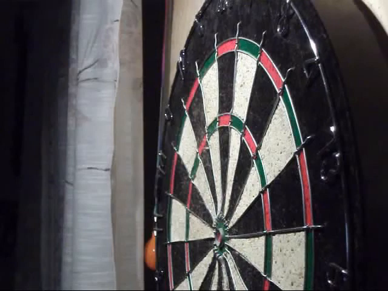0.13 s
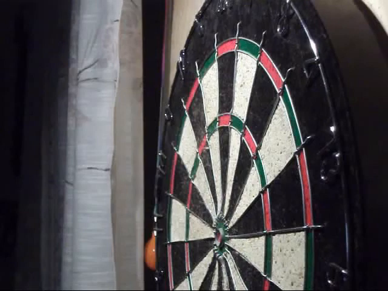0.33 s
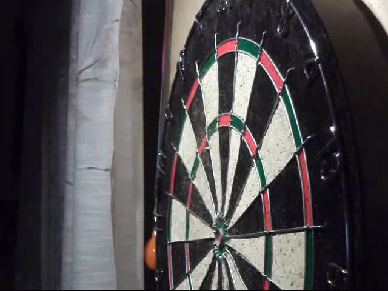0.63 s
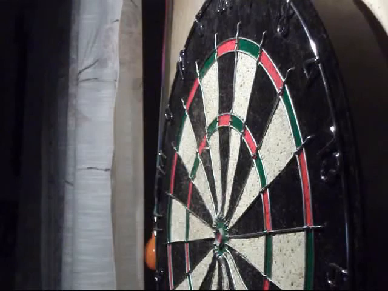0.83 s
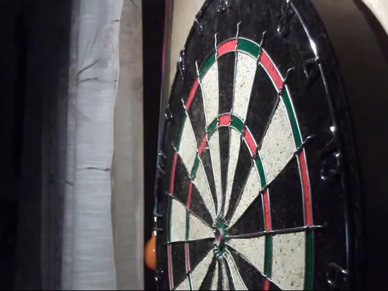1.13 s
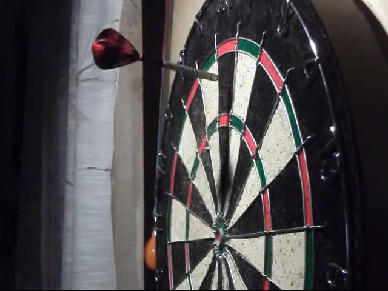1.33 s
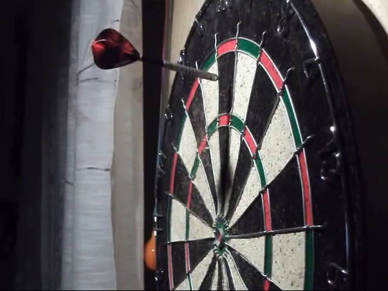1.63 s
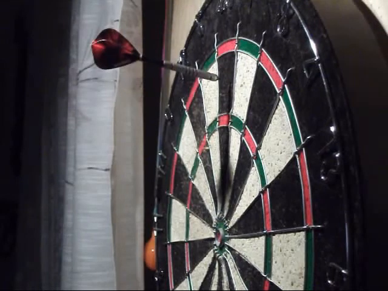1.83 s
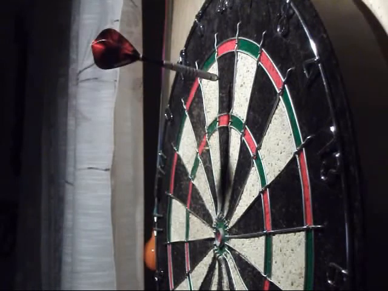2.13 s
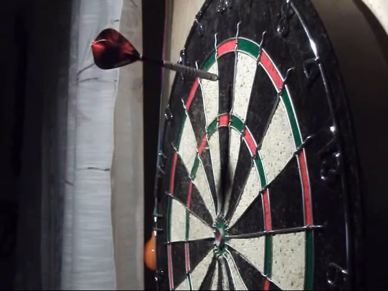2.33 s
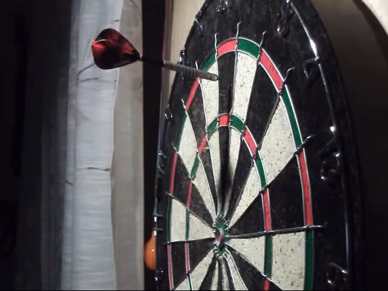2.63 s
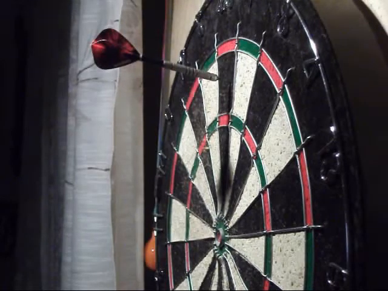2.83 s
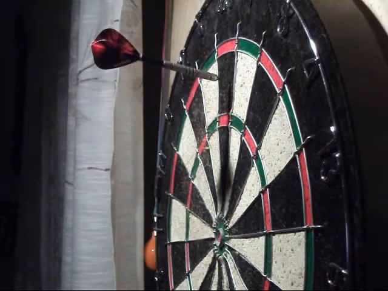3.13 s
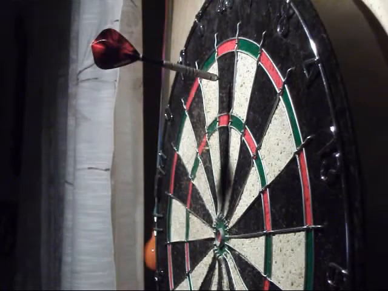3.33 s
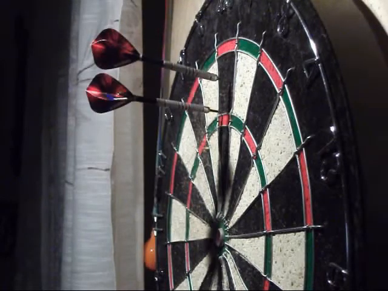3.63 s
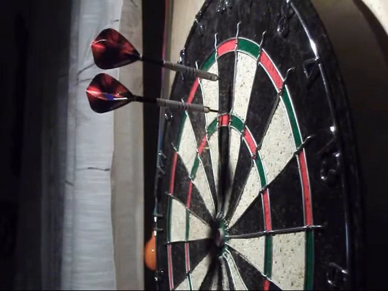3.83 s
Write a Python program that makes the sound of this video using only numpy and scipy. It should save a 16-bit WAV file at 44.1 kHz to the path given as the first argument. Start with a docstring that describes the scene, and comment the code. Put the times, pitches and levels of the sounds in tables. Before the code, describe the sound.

Two darts hit a bristle board, very close and slightly overloaded. After a brief silence, faint hum and hiss begin at 0.16 s. At 1.3 s a sharp crunching thud rings briefly and decays in a small live room. Soft knocks and tiny metallic clinks of handled darts follow at 1.6-2.0 s. At 3.5 s the second dart thuds, clacking against the first, with another faint clink near 3.9 s.

```python
"""Two darts hitting a bristle board

Two steel-tipped darts hit a bristle board close to the microphone, in a small, fairly live room.
Each point crunches into the fibres (shaped noise), the dart rings and the board thuds (decaying modes);
the second dart clacks against the first. Further off, darts click faintly in the thrower's hand,
over a steady hum and hiss (resonant noise and wavering sines). The hits overload the microphone."""
import sys
import numpy as np
from scipy import signal
from scipy.fft import rfft, irfft
from scipy.io import wavfile

SR = 44100
rng = np.random.default_rng(int(sys.argv[2]) if len(sys.argv) > 2 else 0)


def master(y):
    """Save y as 16-bit WAV."""
    cut = np.clip(np.atleast_2d(y).T, -1, 1)
    pcm = np.round(cut * 32767)  # scale
    wavfile.write(sys.argv[1], SR, pcm.astype(np.int16))


N = 176400
T = np.arange(N) / SR  # time axis, s
HZ = np.maximum(np.fft.rfftfreq(N, 1 / SR), 1)  # frequency axis, kept above zero for the logarithms

# The two hits: onset t/s, crunch level/dB, crunch length t/s, crunch tilt/(dB per octave),
# dart delay t/s, board delay t/s, diffuse tail level/dB, diffuse tail tilt/(dB per octave)
HITS = [(1.3312, -10, 0.0081, -1, .0037, .0075, -23, -0.5),
        (3.5252, -11.5, 0.0045, -0.6, .0029, 0.00595, -23, -0.64)]


def from_db(db):
    """Level definition: an amplitude ratio is 10 to the power dB/20."""
    return 10 ** (np.asarray(db) / 20)


def at_hz(points, hz):
    """Logarithmic pitch scale: a table is interpolated linearly along log frequency."""
    log_points = [(np.log(f), value) for f, value in points]
    return np.interp(np.log(hz), *np.transpose(log_points))


def noise(gain):
    """Spectral shaping: white noise is weighted per frequency, then scaled to rms 1."""
    x = irfft(rfft(rng.standard_normal(N)) * gain, N)
    return x / np.std(x)


def resonance(hz, width):
    """Lorentzian peak: the gain halves at one width (Hz) from the centre."""
    return 1 / (1 + ((HZ - hz) / width) ** 2)


def dying(start, t60):
    """Exponential decay: the envelope jumps to 1 and loses 60 dB in every t60 seconds."""
    loss_db = 60 * np.maximum(T - start, 0) / t60
    return (T >= start) * from_db(-np.minimum(loss_db, 300))


def ring(start, hz, t60):
    """Free vibration: a struck mode is an exponentially decaying sine."""
    return dying(start, t60) * np.sin(2 * np.pi * hz * (T - start))


def crunch():
    """Friction noise: the point tears fibres, growing to full force halfway in, then the noise decays."""
    # Fibre noise spectrum before the tilt: f/Hz, level/(dB per Hz)
    fibre_spectrum = [(100, 2.5), (240, -52), (500, -8), (1000, 2.5), (1350, -6), (1800, 2), (2600, 2),
                      (4000, 1), (5500, -5.5), (8000, -3.5), (9500, -8.5), (12500, -12.5)]
    start_db, t60 = -18, 0.025  # level at first contact, dB; decay after entry, s
    out = np.zeros(N)
    for s, db, length, tilt_db, *_ in HITS:
        growth = start_db * np.clip(1 - 2 * (T - s) / length, 0, 1)
        entering = ((T >= s) & (T < s + length)) * from_db(growth)
        fibres = noise(from_db(at_hz(fibre_spectrum, HZ) + tilt_db * np.log2(HZ)))
        out += from_db(db) * fibres * (entering + dying(s + length, t60))
    return out


def board():
    """Modal response: the pushed board thuds against its backing as a sum of damped modes."""
    # Modes of board and backing: f/Hz, t60 t/s, first hit level/dB, second hit level/dB (before the band-pass)
    board_modes = [(322, 0.1, -44, -19.5), (380, 0.12, -48, -21.5), (449.6, 0.37, -22.5, -18),
                   (498, 0.044, -5.5, -6.5), (494, 0.48, -27, -29), (557, 0.025, -6, -1),
                   (584, 0.4, -42, -29), (640, 0.19, -44, -43), (753, 0.9, -35.5, -34),
                   (830, 0.18, -37, -31), (983, 0.17, -33, -24), (1165, 0.25, -40, -31)]
    # Band-pass around the thud: low f/Hz, high f/Hz
    thud_band = [340, 2000]
    thud = np.zeros(N)
    for k, (s, _, _, _, _, lag, *_) in enumerate(HITS):
        for hz, t60, *levels_db in board_modes:
            thud += from_db(levels_db[k]) * ring(s + lag, hz, t60)
    return signal.sosfilt(signal.butter(2, thud_band, "band", fs=SR, output="sos"), thud)


def dart_rings():
    """Modal response: the stopped dart's barrel and shaft ring as damped sines with bass-free onsets."""
    # Barrel and shaft modes: f/Hz, t60 t/s, first hit level/dB, second hit level/dB (before the high-pass)
    dart_modes = [(950, 0.051, -14.5, -7), (1874, 0.029, -15, -5.5), (1995, 0.026, -35, -20),
                  (2234, 0.038, -17.5, -34), (2515, 0.019, -13.5, -25), (3050, 0.016, -31, -14),
                  (3217, 0.042, -17, -13), (4460, 0.048, -13.5, -41), (6500, 0.053, -18, -42),
                  (7630, 0.038, -24, -33), (9400, 0.027, -39, -18)]
    high_pass_hz = 610  # keeps the abrupt onsets free of bass
    rings = np.zeros(N)
    for k, (s, _, _, _, lag, *_) in enumerate(HITS):
        for hz, t60, *levels_db in dart_modes:
            rings += from_db(levels_db[k]) * ring(s + lag, hz, t60)
    return signal.sosfilt(signal.butter(2, high_pass_hz, "high", fs=SR, output="sos"), rings)


def clacks():
    """Impact of hard bodies: point and dart-on-dart contacts are noise dying within milliseconds."""
    # Contacts: t/s, level/dB
    contacts = [(1.3321, -8), (3.5292, -9), (3.549, -4)]
    # Contact spectrum: f/Hz, level/(dB per Hz)
    contact_spectrum = [(500, -4), (2000, 0.5), (4000, -5), (6500, -5.5), (9000, -19), (12500, -32)]
    t60 = 0.0045  # s
    envelope = sum(from_db(db) * dying(s, t60) for s, db in contacts)
    return noise(from_db(at_hz(contact_spectrum, HZ))) * envelope


def hand():
    """Soft and hard contact: soft knocks swell and decay, barrels clink as narrow-band noise."""
    # Darts shifted in the hand: t/s, level/dB (before the rise and decay)
    shifts = [(1.624, -32), (1.765, -35), (1.874, -39), (1.988, -34), (3.851, -32)]
    # Knock spectrum: f/Hz, level/(dB per Hz)
    knock_spectrum = [(250, -12), (500, 7), (900, 10), (1200, -8), (1500, 3), (2500, -19), (6000, -14.5),
                      (12000, -16.5)]
    # Barrels touching: t/s, level/dB
    touches = [(1.639, -55), (1.777, -52.5), (1.884, -60), (2.000, -59), (3.863, -45), (3.895, -56)]
    # Barrel resonances: f/Hz each
    barrel_hz = [5240, 5850]
    knock_rise, knock_t60, clink_t60 = .012, .15, .3  # s
    chatter_hz = 35  # resonance width, Hz: makes the clinks flutter
    knocks = np.zeros(N)
    for s, db in shifts:
        rise = np.clip((T - s) / knock_rise, 0, 1)
        knocks += from_db(db) * rise * dying(s, knock_t60)
    clinks = sum(from_db(db) * dying(s, clink_t60) for s, db in touches)
    barrels = noise(sum(resonance(hz, chatter_hz) for hz in barrel_hz))
    return knocks * noise(from_db(at_hz(knock_spectrum, HZ))) + clinks * barrels


def diffuse_tail():
    """Diffuse decay: after each hit, the board, its wires and the flight shudder as smooth noise that dies
    away, with one low thump."""
    # Tail spectrum before the tilt: f/Hz, level/(dB per Hz)
    tail_spectrum = [(130, -9), (240, -15.5), (330, -5.5), (480, -13), (680, -3), (900, 3), (1150, -5),
                     (1380, -11), (1850, -8.5), (3000, -20.5), (4500, -14.5), (5500, -28), (9300, -25),
                     (10300, -14), (12000, -16.5), (12700, -34)]
    tail_t60 = 0.61  # s
    thump_hz, thump_t60, thump_db = 89, .07, -22  # thump of the mounting: Hz, s, dB
    out = np.zeros(N)
    for s, _, _, _, _, lag, db, tilt_db in HITS:
        tail = noise(from_db(at_hz(tail_spectrum, HZ) + tilt_db * np.log2(HZ)))
        out += from_db(db) * dying(s + lag, tail_t60) * tail
        out += from_db(thump_db) * ring(s + lag, thump_hz, thump_t60)
    return out


def room(x):
    """Reverberation: convolution with discrete echoes and a noise response that decays band by band."""
    # Reverberation level against the direct sound: f/Hz, level/dB
    reverb_level = [(100, 1), (240, -9.5), (350, -2.5), (520, -9.5), (850, -7), (1050, -6.5), (1350, -11.5),
                    (2200, -14), (5000, -15.5), (8500, -13.5), (10500, -9.5), (12000, -14)]
    # Reverberation time: f/Hz, t60 t/s
    reverb_t60 = [(200, 0.55), (600, 0.8), (2000, 0.87), (5000, 0.96), (12000, 0.82)]
    # Nearby surfaces: delay t/s, level/dB
    echoes = [(.0038, -29.5), (0.0117, -25), (.0185, -23), (.0385, -35.5)]
    reverb_delay = 0.00665  # s
    edges = np.geomspace(70, 15000, 23)  # band edges, Hz
    white, response = rng.standard_normal((4, N)), np.zeros(N)
    for k, (low, high) in enumerate(zip(edges, edges[1:])):
        hz = np.sqrt(low * high)
        fade = dying(reverb_delay, at_hz(reverb_t60, hz))
        decay = white[k % len(white)] * fade / np.linalg.norm(fade)
        band = signal.butter(3, [low, high], "band", fs=SR, output="sos")
        response += from_db(at_hz(reverb_level, hz)) * signal.sosfilt(band, decay)
    for delay, db in echoes:
        response[int(delay * SR)] += from_db(db)
    return signal.fftconvolve(x, response)[:N]


def background():
    """Stationary noise and frequency modulation: hiss, air resonances and wavering fan tones."""
    # Hiss spectrum: f/Hz, level/(dB per Hz)
    hiss_spectrum = [(20, -5.5), (35, -7.5), (60, -7.5), (110, -6.5), (185, -10), (260, -16), (340, -13),
                     (480, -8.5), (640, -21), (780, -16), (1300, -20.5), (2100, -22.5), (2700, -21.5),
                     (3600, -24.5), (5500, -31), (8600, -31), (10000, -36), (12500, -35.5)]
    # Resonances in the air noise: f/Hz, width f/Hz, level/dB
    air_peaks = [(80.5, 5.6, -52), (121.6, 11, -49), (364, 9.3, -53), (406.4, 14, -49.5), (587, 17, -62),
                 (1672, 67, -59), (2386, 25, -63), (2557, 66, -56), (8460, 97, -65)]
    # Fan tones: f/Hz, level/dB
    fan_tones = [(77.5, -42.5), (128, -53.5), (164, -57), (409, -52), (980, -60.5), (2396, -61)]
    hiss_db = -41
    waver_hz, waver_rate_hz = 2.55, 4  # rms pitch deviation; width of its slow spectrum
    air = sum(from_db(db) * noise(resonance(hz, width)) for hz, width, db in air_peaks)
    tones = np.zeros(N)
    for hz, db in fan_tones:
        pitch = hz + waver_hz * noise(resonance(0, waver_rate_hz))
        phase = 2 * np.pi * np.cumsum(pitch) / SR
        tones += from_db(db) * np.sqrt(2) * np.sin(phase)  # the root of 2 makes the level an rms
    hiss = from_db(hiss_db) * noise(from_db(at_hz(hiss_spectrum, HZ)))
    return air + tones + hiss


def scene():
    """Superposition: hits and handling, their reverberation and the background add."""
    direct = crunch() + board() + clacks() + hand()
    darts = dart_rings()
    dart_send_db = -2.5  # level of the dart rings sent into the reverberation, dB
    reverberant = room(direct + from_db(dart_send_db) * darts)
    return (direct + darts + diffuse_tail() + reverberant + background())[None]


def record(dry):
    """Saturation and band limiting: the microphone opens, rounds peaks, notches and cuts the treble."""
    # Treble notch: low f/Hz, high f/Hz
    notch_band = [10640, 11420]
    overload, start, cutoff_hz = 0.91, .163, 12850  # amplitude ceiling; silent until, s; Hz
    x = overload * np.tanh(dry * (T >= start) / overload)
    x = signal.sosfilt(signal.butter(1, notch_band, "bandstop", fs=SR, output="sos"), x)
    return signal.sosfilt(signal.ellip(10, .2, 70, cutoff_hz, fs=SR, output="sos"), x)


dry = scene()
out = record(dry)
master(out)
```